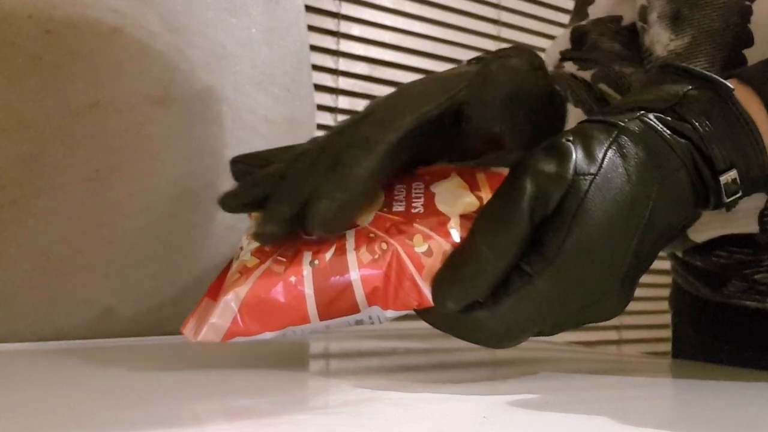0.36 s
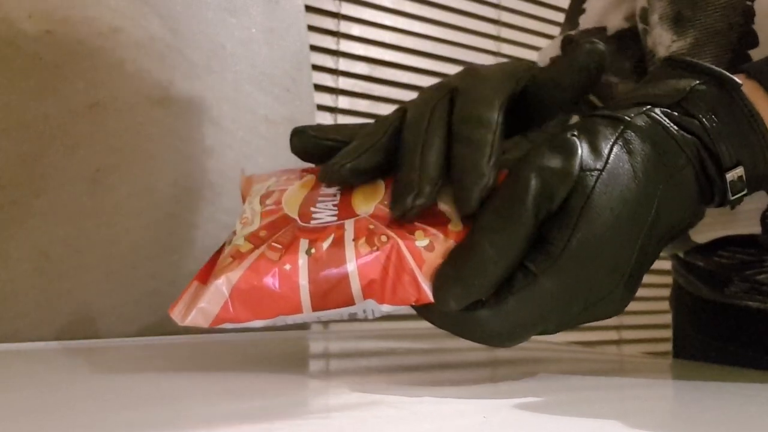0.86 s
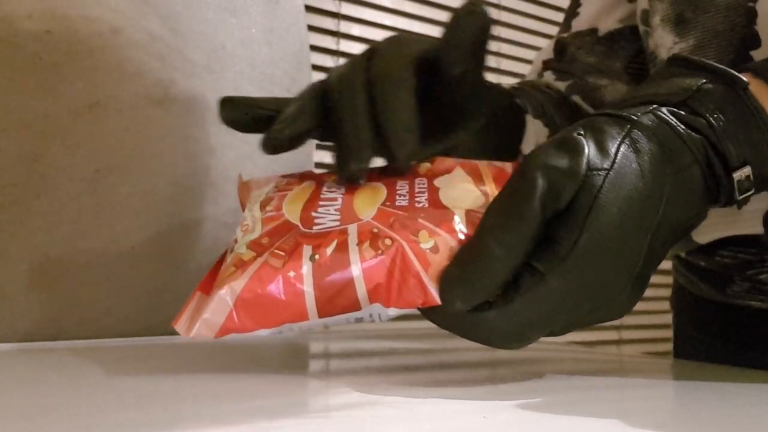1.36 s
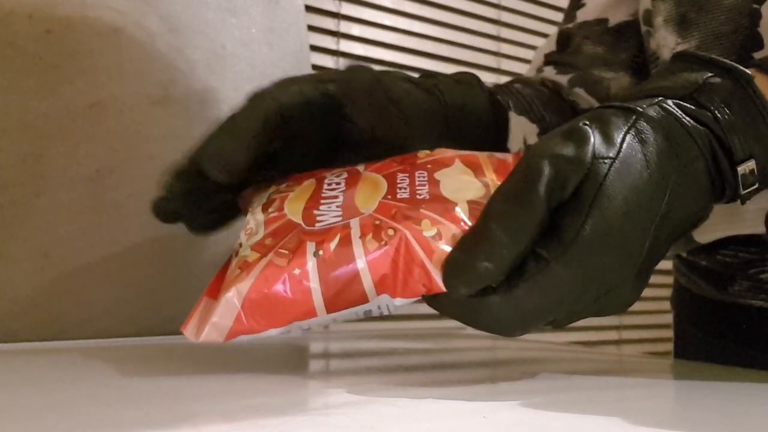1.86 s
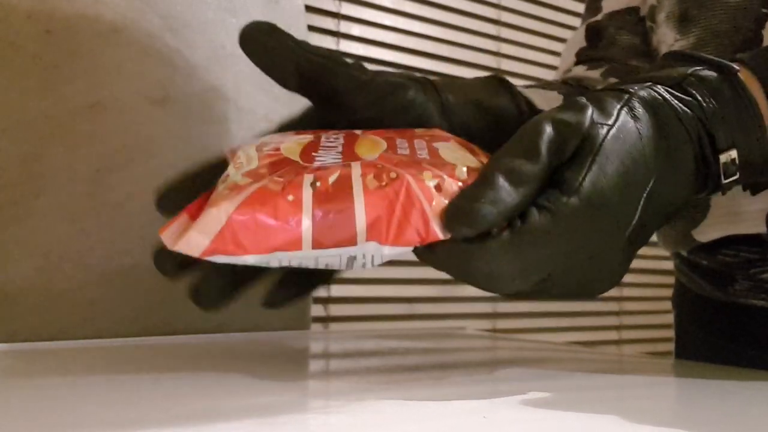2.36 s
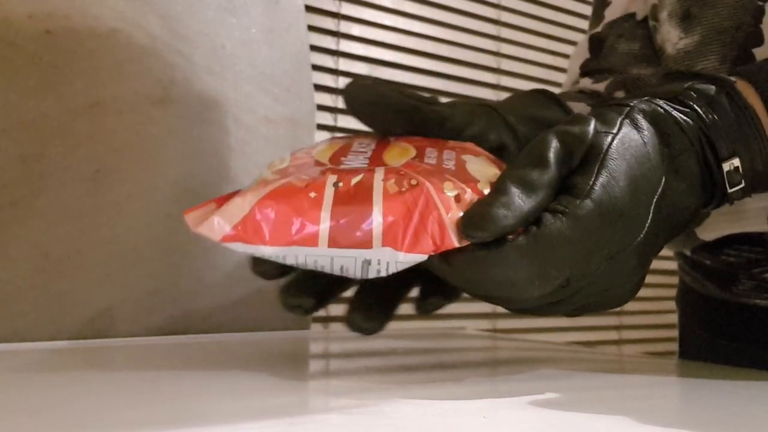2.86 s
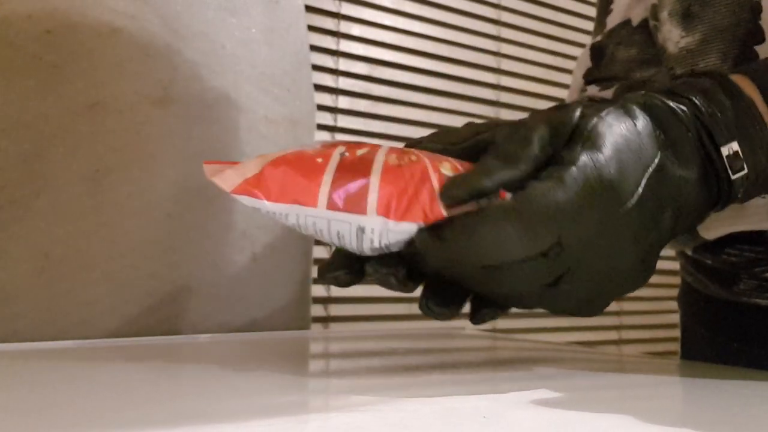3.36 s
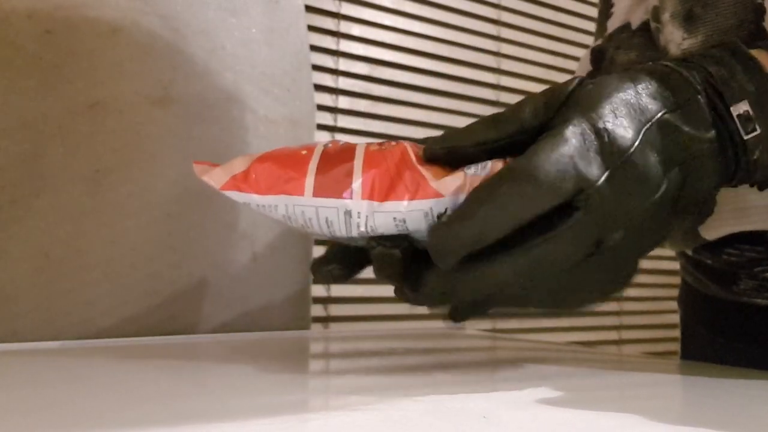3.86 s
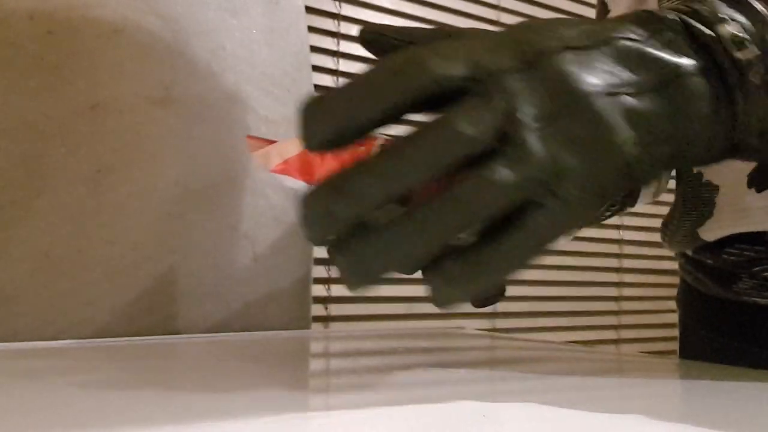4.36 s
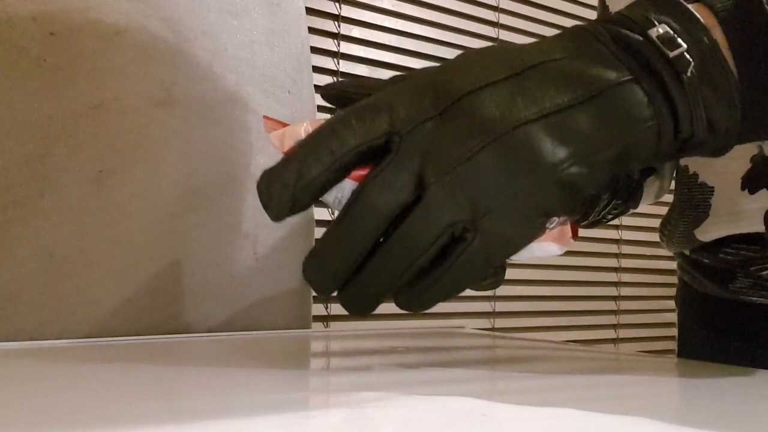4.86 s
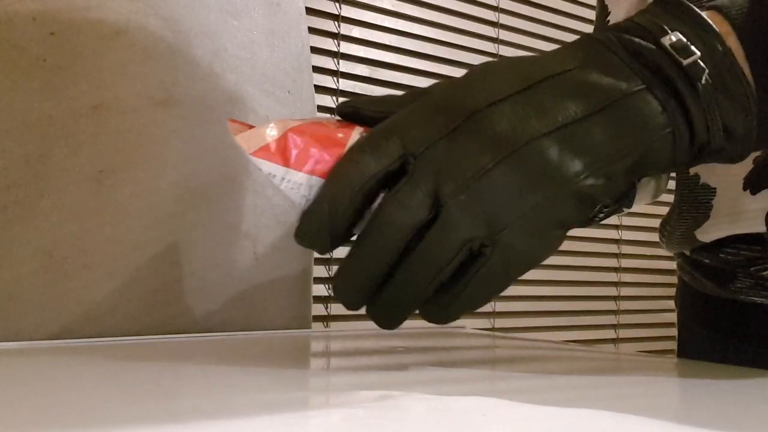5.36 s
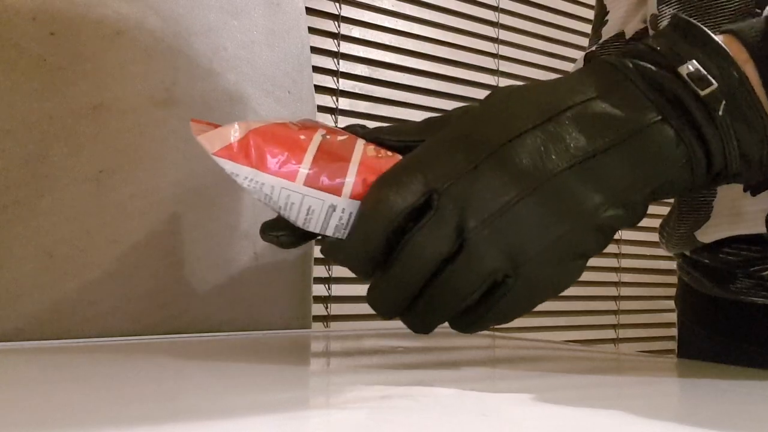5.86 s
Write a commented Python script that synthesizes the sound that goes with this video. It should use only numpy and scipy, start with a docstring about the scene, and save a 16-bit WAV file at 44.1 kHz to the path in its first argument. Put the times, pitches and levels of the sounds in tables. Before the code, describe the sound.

Very close stereo microphone in a small room: gloved hands squeeze a puffy foil snack packet. Bright creases snap irregularly over fine crackle and a duller rustle of glove and contents. Low soft pats thump the air cushion. A squeeze, a short isolated pat, a longer denser squeeze, a half-second lull, then a last busy squeeze, over faint low hum and quiet room air.

```python
"""Squeezing a foil packet

Gloved hands squeeze an air-filled foil packet close to a stereo microphone, over a hard table in a small room.
Creases snap as short resonant noise bursts over a crackle and rustle of many tiny bursts.
Pats thump the air cushion as sines of falling pitch with a low shudder.
Delayed copies from the table and decaying noise from the walls follow; sines hum in steady noise of room air."""
import sys
import numpy as np
from scipy import signal
from scipy.fft import rfft, irfft, next_fast_len
from scipy.io import wavfile
from scipy.ndimage import uniform_filter1d

SR = 44100
rng = np.random.default_rng(int(sys.argv[2]) if len(sys.argv) > 2 else 0)


def gain_from_db(level_db):
    """Turn a decibel level (scalar or array-like) into a linear amplitude factor."""
    decades = np.asarray(level_db, float) / 20
    return 10 ** decades


def bounce(signal):
    """Save signal as a 16-bit WAV file at the path given by the first command-line argument."""
    frames = np.transpose(np.atleast_2d(signal))
    limited = np.clip(frames, -1, 1)
    pcm = np.round(limited * 32767).astype(np.int16)
    wavfile.write(sys.argv[1], SR, pcm)


N = 275625  # samples, 6.25 s

# Relative spectrum of the foil panels: frequency_hz, density_db (per Hz)
FOIL_SPECTRUM = [(590, -41.5), (1000, -5.5), (1250, -2), (1960, -6.5), (4030, -2.5), (5810, -8), (6770, -5),
                 (8570, -16), (13700, -16.5), (15700, -22.5), (16800, -41.5)]
# Relative spectrum of the air cushion: frequency_hz, density_db (per Hz)
CUSHION_SPECTRUM = [(65, -37.5), (110, 11.5), (258, -0.5), (301, -10), (516, 10), (698, -8), (755, 3.5),
                    (1250, -2.5), (1600, -19.5), (2080, -46), (3520, -120)]
# Left-right likeness of near sounds: frequency_hz, likeness (0 to 1)
NEAR_LIKENESS = [(120, 1), (480, 0.9), (1900, 0.55), (3800, 0.56), (8000, 0.082)]
# Left-right likeness of diffuse sounds: frequency_hz, likeness (0 to 1)
DIFFUSE_LIKENESS = [(60, 0.95), (180, .89), (400, 0.89), (800, 0.38), (1650, 0.064)]


def unit(x):
    """Normalisation: scales a signal to an rms of 1."""
    return x / np.sqrt(np.mean(x ** 2) + 1e-20)


def along(points, hz):
    """Logarithmic frequency scale: interpolates (Hz, value) points evenly per octave."""
    point_hz, value = np.transpose(points)
    return np.interp(np.log(hz + 1), np.log(point_hz + 1), value)


def curves(tables):
    """Piecewise-linear envelopes: one value per sample for each column, -150 dB between the tables."""
    t = np.arange(N) / SR
    envelopes = []
    for rows in map(np.array, tables):
        envelopes.append([np.interp(t, rows[:, 0], column, -150, -150) for column in rows[:, 1:].T])
    return np.max(envelopes, axis=0)


def pair(noise, gain, likeness):
    """Interaural coherence: mixes two noises coloured by gain(Hz) to a left and right of given likeness, rms 1."""
    n = noise.shape[-1]
    hz = np.fft.rfftfreq(n, 1 / SR)
    # The cosine of twice this angle is the left-right correlation
    angle = np.arccos(np.clip(along(likeness, hz), 0, 1)) / 2
    a, b = rfft(noise) * gain(hz)
    common, opposed = np.cos(angle) * a, np.sin(angle) * b
    both = irfft(np.array([common + opposed, common - opposed]), n)
    return both / np.sqrt(np.mean(both ** 2, axis=(0, -1), keepdims=True) + 1e-20)


def ring(hz, centre_hz, sharp, rest):
    """Damped resonance: a broad peak at each event's own pitch, over an even rest."""
    return rest + 1 / (1 + (sharp * np.log((hz + 1) / centre_hz[:, None])) ** 2)


def bursts(times, db, pan_db, gain, decay_s, rise, size=1024):
    """Impulsive excitation: short dying bursts, random in phase and even in colour like a click."""
    t = np.arange(size) / SR
    noise = rng.standard_normal((len(times), 2, size)).swapaxes(0, 1)
    decay_s = np.reshape(decay_s, (-1, 1))
    slow, fast = gain_from_db(-60 * t / decay_s), gain_from_db(-60 * t / (0.16 * decay_s))
    shape = (slow + 0.65 * fast) * (1 - np.exp(-t / rise))
    # Keep only the phase of the shaped noise, so that gain alone sets the magnitudes
    phase = np.angle(rfft(pair(noise, gain, NEAR_LIKENESS) * shape))
    shots = irfft(gain(np.fft.rfftfreq(size, 1 / SR)) * np.exp(1j * phase), size)
    shots = shots * shape ** 0.36  # gathers the energy at the onset again
    # The level is that of all the energy gathered into 1.5 ms
    shots = shots / np.sqrt(np.sum(shots ** 2, axis=-1, keepdims=True) / (.0015 * SR))
    shots = shots * gain_from_db(db + np.outer([.5, -.5], pan_db))[..., None]
    at = (np.round(times * SR).astype(int)[:, None] + np.arange(size)).ravel()
    return np.array([np.bincount(at, side.ravel(), N + size)[:N] for side in shots])


def snaps(rows):
    """Snap-through buckling: a crease flips, its panel rings briefly, the treble spits, the air cushion pops."""
    s, db, pop_db, sizzle_db, ring_hz = np.transpose(rows)
    chance = rng.standard_normal((len(s), 3))
    life = gain_from_db(2.5 * chance[:, 0])
    hollow_hz = 600 * np.exp(0.44 * chance[:, 1])  # each pop has its own random pitch around 600 Hz
    # Weak creases lie further round the packet; the side scatter is full from -27 dB down
    weakness = np.minimum(db / -27, 1) ** 2
    pan_db = -1.5 + 2.5 * weakness * chance[:, 2]  # left over right

    def treble(hz):
        return 1 / (1 + (6800 / (hz + 1)) ** 8)

    def panel(hz):
        return gain_from_db(along(FOIL_SPECTRUM, hz)) * ring(hz, ring_hz, 10.3, 0.52) * (1 - treble(hz))

    def sizzle(hz):
        return gain_from_db(along(FOIL_SPECTRUM, hz)) * treble(hz)

    def pop(hz):
        above_bass = 1 / (1 + (300 / (hz + 1)) ** 4)
        return gain_from_db(along(CUSHION_SPECTRUM, hz)) * ring(hz, hollow_hz, 5.3, 0.34) * above_bass

    return (bursts(s, db - 0.86, pan_db, panel, 0.022 * life, rise=0.00028)
            + bursts(s, db + sizzle_db - 1.0, pan_db, sizzle, 0.022 * life, rise=0.00017)
            + bursts(s, db + pop_db - 0.6, 0.31 * pan_db, pop, 0.057 * life, rise=0.00042, size=2048))


def lesser_snaps(level_db, count):
    """Random point process: snap rows at chance moments, stronger where the hands squeeze harder."""
    s, tone = rng.random((count, 2)).T
    scatter_db = 4.5 * rng.standard_normal((count, 3))
    s = s * (N - 1) / SR
    snap_db = level_db[(s * SR).astype(int)] + 9.5
    pop_db, sizzle_db = np.full(count, -4.0), np.full(count, -15.0)  # relative to the snap
    levels_db = np.transpose([snap_db, pop_db, sizzle_db]) + scatter_db
    ring_hz = 1200 * 4.0 ** tone
    return np.column_stack([s, levels_db, ring_hz])


def crackle(level_db, spectrum, low_hz, high_hz, decay_s, spread_db, hiss, count):
    """Crackling noise: many small contacts, each with its own pitch, few far larger than most; gentle ones dull."""
    draw = rng.random((count, 4))
    s = draw[:, 0] * N / SR
    db = -spread_db * np.log(1 - .985 * draw[:, 1])
    pitch_hz = low_hz * (high_hz / low_hz) ** draw[:, 2]
    pan_db = 6.1 * (draw[:, 3] - .5)
    dull = np.clip((-47.5 - level_db[(s * SR).astype(int)]) / 28.0, 0, 1)[:, None]

    def even(hz):
        return gain_from_db(along(spectrum, hz))

    def colour(hz):
        return even(hz) * ring(hz, pitch_hz, 2.7, 0.16) / (1 + dull * (hz / 4500) ** 2)

    grains = bursts(s, db, pan_db, colour, decay_s, rise=0.00026, size=512)
    smooth = pair(rng.standard_normal((2, N)), even, NEAR_LIKENESS)
    return gain_from_db(level_db) * (unit(grains) + hiss * smooth)


def pats():
    """Damped oscillation: each push swings the whole cushion unevenly, its pitch sagging as the hand settles."""
    # Pushes on the cushion: start_s, relative_level_db, nominal_pitch_hz
    pushes = [(0.077, -41, 142), (0.235, -47, 141), (0.458, -42.5, 261), (0.55, -45, 264),
              (0.715, -39, 156), (0.87, -39, 147.8), (1.266, -50, 148), (1.406, -42, 268),
              (1.557, -38.5, 262), (1.698, -27, 150), (2.153, -30, 126), (2.445, -44, 267),
              (2.797, -36.5, 145), (3.274, -38, 269), (3.706, -38, 143), (3.861, -38, 151),
              (5.479, -42, 154)]
    out, t = np.zeros(N + SR), np.arange(SR // 8) / SR
    swing = gain_from_db(-60 * t / 0.06) * (1 - np.exp(-t / .002))
    for s, db, hz in pushes:
        noise = rng.standard_normal(len(t))
        shudder = unit(uniform_filter1d(uniform_filter1d(noise, size=60), size=60))
        # The pitch starts at 1.1 times nominal and falls steadily
        wave = np.sin(2 * np.pi * hz * t * (1.1 - 6.4 * t)) + 0.36 * shudder
        out[round(s * SR):][:len(t)] += gain_from_db(db + 8.0) * swing * wave
    return out[:N]


def walls():
    """Reverberant decay: one answer of the walls as dying noise; bass reaches both ports alike."""
    # Reverberation time of the room: frequency_hz, t60_s
    decay = [(130, 0.27), (250, 0.28), (600, 0.24), (2000, 0.24), (5000, 0.24), (12000, 0.31)]
    noise = pair(rng.standard_normal((2, SR // 2)), np.ones_like, DIFFUSE_LIKENESS)
    hz, t, z = signal.stft(noise, SR, nperseg=256)
    tail = signal.istft(z * gain_from_db(-60 * t / along(decay, hz)[:, None]), SR, nperseg=256)[1]
    return np.pad(tail / np.linalg.norm(tail[0]), ((0, 0), (round(.004 * SR), 0)))  # 4 ms late


def space(x, wet_db, size=8192):
    """Early reflection and reverberation: table echoes, then a diffuse wall tail."""
    # Table echoes: left_delay_s, right_delay_s, level_db
    echoes = [(.0011, 0.0015, -24.5), (.0032, 0.0028, -14), (.0062, 0.0031, -32)]
    out = np.pad(x, ((0, 0), (0, SR)))
    for left_s, right_s, db in echoes:
        out[0, round(left_s * SR):][:N] += gain_from_db(db) * x[0]
        out[1, round(right_s * SR):][:N] += gain_from_db(db) * x[1]
    # The tail's noise is drawn anew for each block, to keep its colour even
    for start in range(0, N, size):
        block = x[:, start:start + size].mean(0, keepdims=True)
        wet = signal.fftconvolve(block, walls(), axes=1)
        out[:, start:start + wet.shape[1]] += gain_from_db(wet_db) * wet
    return out[:, :N]


def background():
    """Superposition of steady sources: a motor hum with mains overtones, in quiet room air."""
    # Hum of the appliance, ahead of the bass cut at the ports: frequency_hz, rms_db
    partials = [(49.2, -50), (100, -66.5), (148, -74.5), (200, -82.5), (400, -86)]
    # Relative spectrum of the room air, held level below 170 Hz: frequency_hz, density_db (per Hz)
    air_spectrum = [(100, -31), (170, -5), (440, -13.5), (512, -12), (721, -16), (1760, -17.5),
                    (16000, -23.5)]
    t = np.arange(N) / SR
    hum = 0
    for hz, db in partials:
        hum = hum + np.sqrt(2) * gain_from_db(db) * np.sin(2 * np.pi * (hz * t + rng.random()))

    def air_gain(hz):
        return gain_from_db(along(air_spectrum, np.maximum(hz, 170.0))) * (hz > 75)

    air = pair(rng.standard_normal((2, N)), air_gain, DIFFUSE_LIKENESS)
    return hum + gain_from_db(-70.5) * air


def scene():
    """Superposition: the packet's sounds in their space, over the background."""
    # Louder creases that snap; levels are nominal, pop and sizzle relative to the snap:
    # start_s, level_db (over 1.5 ms), pop_db, sizzle_db, ring_hz
    creases = [(.002,-30.5,-1.5,-10,3600),(.0153,-35,7.5,-15,3570),(.0542,-35,-26,-29,3000),(.0782,-28,-5,-15,3320),(.0848,-15.5,-10,-10.5,3750),(.1229,-23.5,-8.5,-17,4350),(.1643,-18.5,-4.5,-12,2440),
               (.2388,-25.5,-13,-20,3700),(.2468,-24,-12,-2.5,3700),(.2643,-20,-12,-7,4300),(.2837,-21.5,-14,-27,2670),(.2982,-30,-16,-25,1220),(.3531,-28.5,-16,-17,2450),
               (.3687,-28,-11,-23,4470),(.3973,-22,-19,-13,4630),(.419,-29,-9,-23,2450),(.4333,-28.5,-1,-11,1250),(.4748,-27.5,-4,-23,1600),(.4851,-33,5,-17,2960),
               (.578,-15,-23.5,-6,6700),(.589,-38,9,-13,1200),(.644,-28,-25,-33,2880),(.6775,-32.5,-19,-3,4630),(.7005,-17,-14,-13,4060),(.722,-23.5,-5.5,-3,1450),
               (.7779,-24,-12,-1.5,4560),(.7914,-24.5,-8,-12,4820),(.7971,-22.5,-5.5,-2,6400),(.8489,-25.5,-3.5,-20,4520),(.8733,-12,-9,-5,4840),(.9662,-21,-5,-8,3000),
               (.976,-31,11,-12,3960),(1.0293,-21.5,-9.5,-12,4040),(1.059,-18,0.5,-7.5,3450),(1.1307,-29,-18,-15,4075),(1.1527,-28.5,-15,-9.5,2660),(1.2717,-25,-2,-8,1280),
               (1.3572,-25,-17,-11.5,1500),(1.4212,-35,8.5,-15,2570),(1.4474,-45,15,-22,1210),(1.4838,-15,-9.5,-5.5,2630),(1.5264,-23,1.5,-11,1180),(1.544,-25,-22,-16,3480),
               (1.5495,-23.5,-7,-10,1760),(1.5678,-20,-14,-4,1190),(1.6133,-25.5,-24,-22,2370),(1.6326,-15,-6.5,-11,1430),(1.6559,-18.5,-26,-12,3010),(1.6628,-18,-11,-4,4300),
               (1.6828,-15.5,-6,-6,2800),(1.7037,-13.5,-9,-9.5,1150),(1.7332,-27,0.5,-7,4690),(1.7571,-10,-6,-9,2330),(1.8552,-32,-10,-8,3920),(1.87,-25.5,-9,-16,2420),
               (1.91,-43.5,3,-23,1210),(2.0836,-33,-6,-25,1193),(2.1267,-29.5,-1.5,-11,3600),(2.158,-15.5,-8.5,-15.5,3600),(2.1894,-28.5,-7,-12.5,1240),(2.422,-31.5,-10,-17.5,1240),(2.4497,-33,-14,-15,1248),
               (2.458,-27,-4,-12,1200),(2.4888,-24,-16,-11,3970),(2.4964,-20,-21,-2.5,3670),(2.5505,-25,-5,-5,3500),(2.5554,-18.5,-18,-8,3750),(2.5974,-21.5,-14,-3.5,1110),
               (2.6683,-24,2.5,-17,1198),(2.6882,-27,-8,-24,1220),(2.7023,-25,-3,-1,3800),(2.7242,-31,-4,-16,1380),(2.7532,-28,-15,-2,5640),(2.8026,-23,-5.5,-25,1250),
               (2.8171,-19.5,-25,-5.5,3470),(2.8342,-21.5,-18,-7,3800),(2.8478,-28,-18,-1,5370),(2.8875,-30.5,-5.5,-5,3870),(2.9306,-20,-14,-6,3700),(2.9382,-24.5,-23,-9,1240),
               (2.9453,-21.5,-16,-5.5,4700),(2.9553,-29.5,-19,-3.5,5120),(2.9626,-25.5,-27,-2.5,5060),(3.0097,-28,-1,-7.5,2950),(3.0529,-29,-6,0,3600),(3.0844,-29,-2.5,-14,1295),(3.1449,-22.5,-9.5,-10,3700),
               (3.2075,-25.5,-18,-4.5,6200),(3.2154,-27.5,-4,-7,1220),(3.227,-19.5,-3,-9,4500),(3.2318,-31,-7,7,3490),(3.2548,-17,-7,3.5,5950),(3.2782,-15.5,-6,-1,3750),
               (3.32,-22.5,0,-1.5,1214),(3.3622,-24,-15,-9,5960),(3.3677,-20,-3,-4,4260),(3.4031,-27,-8,2.5,1250),(3.4539,-34.5,7,0,3630),(3.4869,-27.5,4,-12,3570),
               (3.5,-21,-11,-5,3800),(3.5093,-17.5,-1,-5.5,1167),(3.547,-28.5,-7,1,1196),(3.5585,-22.5,-7,-9,3400),(3.578,-25,-11,-19,3660),(3.5946,-31.5,-25,7,6460),
               (3.651,-31,-3,-15,2230),(3.657,-28,-3.5,5,1320),(3.666,-23,-6,-15,4260),(3.7003,-28,-15,-19.5,2800),(3.7102,-11.5,-9.5,-4,3470),(3.7259,-22,-12,-12,4550),
               (3.7559,-15,-6,-10.5,2900),(3.8081,-26,-5,-4,3140),(3.8228,-25,-18,-5,3530),(3.8454,-20,-12,-10,4310),(3.86,-18.5,-3,-4,1230),(3.8748,-14.5,-5,-3.5,4070),
               (3.8823,-15.5,-4,-15,2840),(3.9013,-26,-3,-16,1250),(3.9312,-18,-20,-9,2470),(3.9688,-33,4,-4,1360),(4.0064,-23.5,-2,9,1130),(4.0275,-20,-2.5,-8,2450),
               (4.043,-14.5,-5.5,-7,2776),(4.0587,-22.5,-13,-21,3700),(4.0799,-26.5,-5,0,4080),(4.2936,-38.5,-10.5,-16,2095),(4.6016,-28,-2.5,-14,4510),(4.6292,-17,-9.5,-2.5,2430),
               (4.6373,-21,-1.5,-18,3620),(4.6499,-16.5,-18,-15,3460),(4.674,-26.5,-2,-2,1210),(4.6825,-14,-8.5,-15,3270),(4.6967,-26,-4,-11,1220),(4.7039,-27,-6,-5,3830),
               (4.7216,-31,-8,-4,3320),(4.7427,-23,-12,-18,3570),(4.762,-28,-3,0,1200),(4.8523,-30,-1,-12,4470),(4.89,-28.5,-14,-5.5,1360),(4.9775,-39,3.5,-38,1336),(5.043,-36,-2,-23,1230),
               (5.0741,-37,5,-13,1570),(5.0988,-30,-17,-6,2400),(5.106,-24,-1.5,-12,1640),(5.1198,-15.5,-21,-7.5,4050),(5.1554,-27,0,-20,1200),(5.166,-25.5,-6,-5,4310),
               (5.171,-19.5,-4,-5,3830),(5.2003,-25,-1,-3,2950),(5.209,-21,-13,-7,3044),(5.214,-20.5,0.5,-11,1200),(5.225,-17.5,-4.5,-10,1150),(5.2313,-21.5,-9,-10,3550),
               (5.2442,-25,-10,-6,2900),(5.2844,-30.5,3.5,-3,3450),(5.2996,-15,-13,-9,2340),(5.3076,-19,-4.5,-1,1140),(5.3445,-23.5,-8.5,0,3520),(5.3795,-13,-17.5,-8.5,3970),
               (5.409,-23.5,-16,-13,3930),(5.43,-28,-13,0,4220),(5.4415,-17,-16,-6.5,4100),(5.4527,-24,-7,-17,1210),(5.4665,-29,-2,-22,1210),(5.4709,-11,-12,-7,3850),
               (5.4859,-16.5,-12,-3.5,4020),(5.4979,-26,-1,-17,3340),(5.5031,-24.5,-3,-1,1260),(5.52,-22,2,-19,2840),(5.556,-18,-3.5,-2.5,2500),(5.5808,-28,-5,-2,1195),
               (5.6117,-16.5,-17.5,-5.5,4270),(5.6317,-24,5,-10,1210),(5.6404,-26.5,-20,-24,1200),(5.6894,-23,-17,-10,3720),(5.7069,-23,-3.5,-15,3350),(5.7147,-12,-10,-7.5,3860),
               (5.7471,-22,-15,-17,2760),(5.7523,-28.5,.5,1,2640),(5.8631,-27.5,-3,-11,1220),(5.8789,-20,-25,-8,3100),(5.9185,-26,-31,-10,3700),(5.936,-17.5,-1,-7,1270),
               (5.97,-17.5,-6.5,-7,2860),(6.0032,-22.5,-14,-7,4500),(6.0242,-29.5,-14,-3,4420),(6.069,-28,0,-26,1190),(6.0956,-28,-11,-1.5,3140),(6.1058,-26,-13,1,4700),
               (6.1302,-31.5,-13,-6,4000),(6.1473,-28,-17,-9,2520),(6.1809,-21.5,-11,-8,3100)]
    # Grip of the hands in three squeezes, and a pat between the first two; relative levels:
    # time_s, fine_crackle_db, rustle_db (glove and crisps)
    grip = [
        [(0, -36.5, -45), (.22, -50.5, -46), (.5, -47.5, -45), (.93, -49.5, -53), (1.12, -52, -48),
         (1.4, -47, -44), (1.7, -45, -37.5), (1.88, -54.5, -46), (2.03, -65, -69)],
        [(2.09, -72, -67.5), (2.15, -35.5, -41), (2.2, -47, -39.5), (2.24, -58, -70)],
        [(2.375, -58.5, -68), (2.395, -52.5, -53.5), (2.44, -37.5, -36.5), (2.63, -53, -46),
         (2.8, -38.5, -41.5), (3.15, -45.5, -45), (3.38, -38.5, -36), (3.61, -45.5, -54), (3.88, -33.5, -37),
         (4.06, -37.5, -39.5), (4.11, -42.5, -49.5)],
        [(4.57, -72.5, -68), (4.62, -39, -44), (4.77, -41, -47.5), (4.85, -48, -54), (5.03, -52.5, -53),
         (5.15, -37.5, -47.5), (5.34, -47.5, -52), (5.47, -37, -40.5), (5.7, -44, -52), (5.95, -51.5, -50.5),
         (6.25, -47.5, -63)],
    ]
    fine_db, rustle_db = curves(grip)
    fine = crackle(fine_db - 4.0, FOIL_SPECTRUM, 1300, 11000, 0.011, spread_db=2.0, hiss=0.08, count=2200)
    rustle = crackle(rustle_db - 3.5, CUSHION_SPECTRUM, 140, 1300, 0.02, spread_db=4.0, hiss=0.31, count=1300)
    snapping = snaps(creases) + snaps(lesser_snaps(fine_db, count=130))
    packet = snapping + fine + rustle + pats()
    return space(packet, wet_db=-7.5) + background()


def roll_off(x):
    """The treble ends steeply here."""
    return signal.sosfilt(signal.butter(12, 16980, fs=SR, output="sos"), x)


def record(dry):
    """Diffraction and path difference: the ports are shaded unequally, cut deep bass, the right one hears later."""
    # The microphone's body shades its ports: frequency_hz, left_over_right_db
    shade = [(100, 0.7), (400, -2), (1400, 3), (2800, 3), (5000, -3), (9000, 1), (14000, -2)]
    lead_s = .00008  # the left port is nearer
    m = next_fast_len(N + 8192)
    hz = np.fft.rfftfreq(m, 1 / SR)
    bass_cut = (1j * hz / (1j * hz + 43.3)) ** 3
    band_limit = 1 / (1 + (hz / 16200) ** 60)  # the finished sound ends near 16 kHz
    shading = gain_from_db(np.outer([.5, -.5], along(shade, hz)))
    delay = np.exp(-2j * np.pi * np.outer([0, lead_s], hz))
    mix = irfft(rfft(dry, m) * bass_cut * band_limit * shading * delay, m)[:, :N]
    return roll_off(mix)


dry = scene()
out = record(dry)
bounce(out)
```